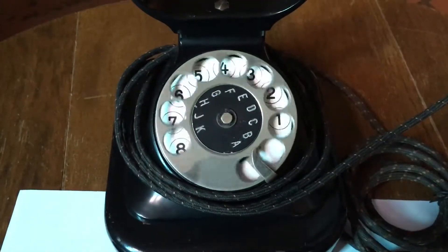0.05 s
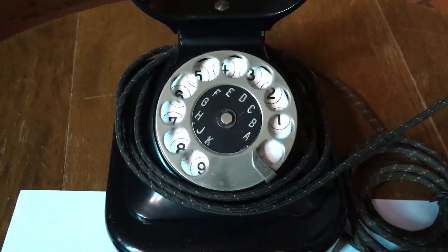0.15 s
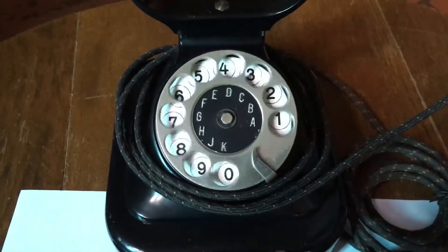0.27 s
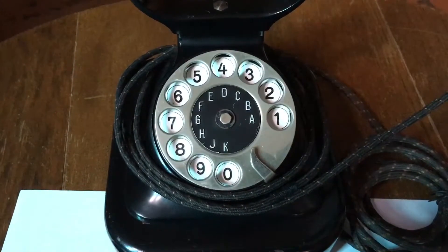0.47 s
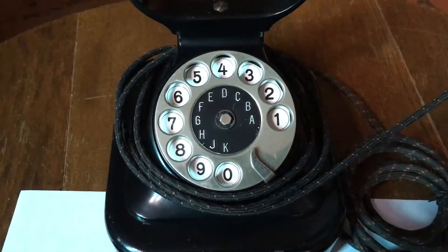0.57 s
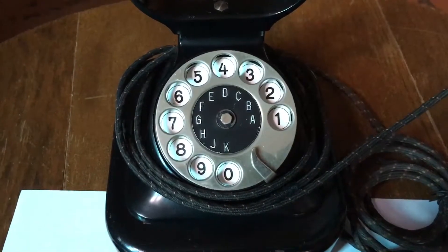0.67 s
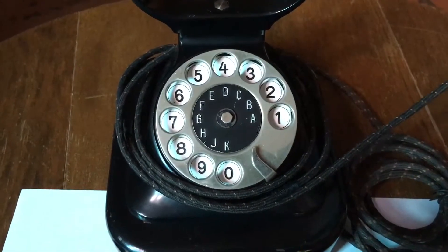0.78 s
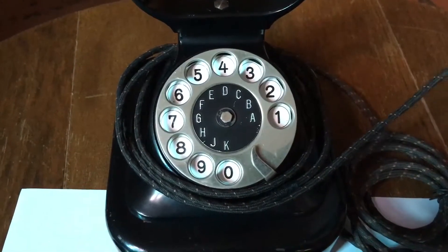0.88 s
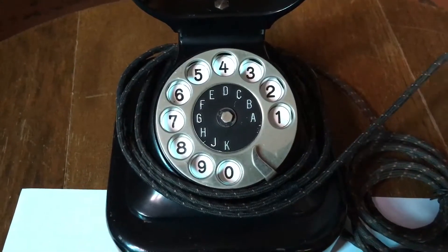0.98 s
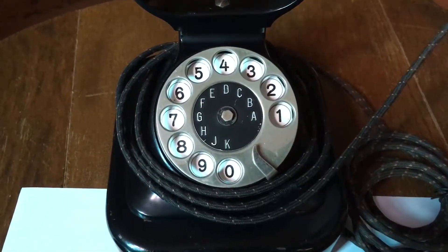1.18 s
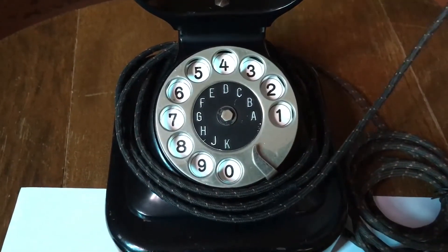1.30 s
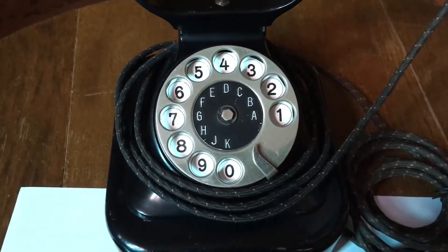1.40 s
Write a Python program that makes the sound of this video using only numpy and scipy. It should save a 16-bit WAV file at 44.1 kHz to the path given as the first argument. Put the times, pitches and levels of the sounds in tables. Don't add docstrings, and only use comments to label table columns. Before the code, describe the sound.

Rotary telephone dial runs back with quick ticks and stops with a sharp, hollow clack

```python
import sys
import numpy as np
from scipy import signal
from scipy.io import wavfile
from scipy.ndimage import uniform_filter1d

SR = 44100
rng = np.random.default_rng(int(sys.argv[2]) if len(sys.argv) > 2 else 0)


def volts(x):
    e = np.asarray(x, float) / 20
    return 10 ** e


def wrap_up_sound(samples):
    columns = np.atleast_2d(samples).T
    tamed = np.clip(columns, -1, 1)
    steps = np.round(tamed * 32767).astype(np.int16)
    wavfile.write(sys.argv[1], SR, steps)


N = 63945


def evened(x):
    return x / np.sqrt(np.mean(x ** 2) + 1e-20)


def read(points, hz):
    point_hz, value = np.transpose(points)
    return np.interp(np.log(hz + 1), np.log(point_hz + 1), value)


def drift(top_hz):
    hz = np.geomspace(top_hz / 10, top_hz, 20)[:, None]
    turns = hz * np.arange(N) / SR + rng.random(hz.shape)
    return evened((np.sin(2 * np.pi * turns) / np.sqrt(hz)).sum(0))


def noise(colour, patchy_db):
    size, hop = 2048, 512
    hz = np.fft.rfftfreq(size, 1 / SR)
    real, imag, raw = rng.standard_normal((N // hop + 5, len(hz), 3)).T
    patches = uniform_filter1d(raw, size=20, axis=0)
    patches = evened(uniform_filter1d(patches, size=5, axis=1))
    level_db = read(colour, hz)[:, None] + patchy_db * patches
    spectra = (real + 1j * imag) * volts(level_db)
    return evened(signal.istft(spectra, nperseg=size, noverlap=size - hop)[1][:N])


def burst(rows, colour, t60_s):
    t = np.arange(N) / SR
    shape = np.zeros(N)
    for start_s, level_db in rows:
        late_s = np.maximum(t - start_s, 0)
        attack = np.minimum(late_s / 0.0002, 1)
        shape += volts(level_db - 60 * late_s / t60_s) * attack
    return shape * noise(colour, 2.1)


def ring(modes, rise_s):
    t = np.arange(SR) / SR
    x = np.zeros(SR)
    for hz, level_db, t60_s in modes:
        phase_turns = 0.2 * rng.random()
        x += volts(level_db - 60 * t / t60_s) * np.sin(2 * np.pi * (hz * t + phase_turns))
    return x * (1 - np.exp(-t / rise_s))


def strikes(rows, chatter_db):
    chatter_decay_s, chatter_per_s, length = 0.0014, 3000, 400
    t = np.arange(length) / SR
    x = np.zeros(N)
    for start_s, level_db in rows:
        chance, height = rng.random((length, 2)).T
        rebound = chance < chatter_per_s / SR
        clicks = volts(chatter_db) * rebound * (2 * height - 1) * np.exp(-t / chatter_decay_s)
        clicks[0] = 1
        at = max(round(start_s * SR), 0)
        x[at:at + length] += volts(level_db) * clicks
    return x


def struck(rows, modes, rise_s, chatter_db):
    body = ring(modes, rise_s)
    return signal.fftconvolve(strikes(rows, chatter_db), body / abs(body).max())[:N]


def contacts():
    # start_s, level_db
    opens = [
        (0.0002, -22.5),
        (0.1043, -20),
    ]
    closes = [
        (0.0248, -27),
        (0.1291, -28.5),
    ]
    # pitch_hz, level_db, t60_s
    open_modes = [(2260, -21, 0.034), (3300, -12.5, 0.0084), (4400, -23, 0.0064), (5950, -0.5, 0.02),
                  (6490, 1, 0.0071), (6840, 0, 0.0064), (8900, -17, 0.0135), (9700, -14.5, .005),
                  (11440, -14.5, 0.012), (14000, -4.5, 0.0059), (15700, -16.5, 0.007)]
    close_modes = [(1660, -16, 0.068), (2380, -13, 0.016), (4560, -15, .015), (6206, -7.5, 0.035),
                   (7180, 1.5, 0.00994), (8872, -2.5, 0.011), (11100, -11, 0.0075), (13500, -13.5, .01)]
    # hz, db_per_hz
    snap_colour = [(880, -56), (1500, -22), (2300, 1.5), (3350, -9), (5770, -8.5), (12500, -21),
                   (16000, -34)]
    # start_s, level_db
    open_knocks = [
        (0.0005, -35),
        (0.1045, -41),
    ]
    close_knocks = [
        (0.0265, -36.5),
        (0.1295, -35),
    ]
    # pitch_hz, level_db, t60_s
    open_knock_modes = [(697, 5.5, 0.06), (730, -8.5, 0.029), (1300, -11.5, .02)]
    close_knock_modes = [(820, -0.5, 0.0263), (676, -10, 0.025)]

    springs = struck(opens, open_modes, 0.000588, -5.5) + struck(closes, close_modes, 0.00015, -5.5)
    snaps = [(start_s, level_db - 18.5) for start_s, level_db in opens]
    snaps += [(start_s, level_db - 8.5) for start_s, level_db in closes]
    knocks = struck(open_knocks, open_knock_modes, 0.0012, -12.5)
    knocks += struck(close_knocks, close_knock_modes, 0.0026, -11)
    return springs + burst(snaps, snap_colour, 0.05) + knocks


def gear_ticks():
    # start_s, level_db, pitch_hz, t60_s
    ticks = [(0.0893, -45, 10400, 0.016), (0.0896, -43, 3150, 0.029), (0.0903, -45, 6050, 0.021),
             (0.1951, -54, 13400, 0.021), (0.2111, -45, 12600, .021), (0.2113, -35, 7100, 0.015),
             (0.2129, -31, 6050, .013), (0.2311, -34, 6450, 0.017), (0.2936, -51, 11100, .016),
             (0.2954, -40, 2420, 0.022), (1.1701, -59, 12000, .012)]
    out = np.zeros(N)
    for start_s, level_db, pitch_hz, t60_s in ticks:
        ratios = volts(np.linspace(-2, 2, 14) + 0.6 * rng.random(14))
        modes = [(pitch_hz * ratio, 0, t60_s) for ratio in ratios]
        out += struck([(start_s, level_db)], modes, 0.00052, -1.1)
    return out


def clack():
    # start_s, metal_db, case_db
    blows = [
        (0.2067, -41, -25),
        (0.2178, -10.5, -19),
        (0.2194, -1, -29.5),
        (0.2211, -19, -6),
        (0.2223, -23, -33),
    ]
    # pitch_hz, level_db, t60_s
    wheel_modes = [(1705, -8, 0.012), (2158, -4, 0.022), (2620, -3, .013), (2875, 2, 0.007),
                   (3180, 5, .009), (3720, -1, 0.011), (4380, -5, 0.007), (4900, -8, 0.004),
                   (5450, -7, .007), (6300, -3, 0.006), (7100, -4, .005), (8700, -19, 0.012),
                   (11530, -28, 0.045), (14150, -12, .004)]
    # pitch_hz, level_db, t60_s
    case_modes = [(160, -20, 0.18), (194.5, -11.5, 0.15), (311.9, -19.5, 0.11), (421.3, -3, 0.093),
                  (516, 1.5, 0.058), (590, -7, 0.086), (637, 9, 0.034), (698.7, -16, 0.027),
                  (875, 5, 0.053), (971, -1, 0.048), (1140, -10, 0.045), (1319.6, -18, 0.022)]
    # hz, db_per_hz
    crack_colour = [(880, -38), (1500, -28), (3000, 2), (5170, -5.5), (6760, -2), (10500, -20.5),
                    (13900, -12.5), (16000, -39)]

    metal_blows = [(start_s, metal_db) for start_s, metal_db, _ in blows]
    case_blows = [(start_s, case_db) for start_s, _, case_db in blows]
    metal = struck(metal_blows, wheel_modes, 0.0001, -14.5)
    crack = volts(-7) * burst(metal_blows, crack_colour, 0.009)
    return metal + crack + struck(case_blows, case_modes, 0.0006, -20)


def bells_and_rattle():
    stop_s = 0.2193
    # pitch_hz, level_db, t60_s
    bell_modes = [(1534, -57, 1.2), (2105, -46.5, 0.45), (2170, -45.5, 1.25), (3774, -63, 1.0),
                  (6062, -55, .26), (7364, -55.5, 1.2), (13400, -54, .3)]
    # hz, db_per_hz
    rattle_colour = [(150, -51), (250, -5.5), (407, -8), (2710, -16), (3710, -12.5), (4730, -32.5),
                     (5930, -16), (13700, -44.5), (16000, -54)]
    at = round(stop_s * SR)
    bells = np.zeros(N)
    bells[at:at + SR] = ring(bell_modes, 0.0064)
    return bells * volts(0.36 * drift(21)) + burst([(stop_s, -35.5)], rattle_colour, 0.37)


def governor():
    whirr_db, end_s, fade_s = -51, 0.3, 0.018
    # hz, db_per_hz
    whirr_colour = [(250, -33.5), (400, -6), (900, -9.5), (2100, -7.5), (3500, -16), (6200, -17.5),
                    (8000, -24.5), (15500, -41.5)]
    # start_s, pitch_hz, level_db
    teeth = [(0.0, 460, -65), (0.016, 477, -44), (0.036, 471, -48), (0.054, 482, -54.5), (0.076, 481, -48),
             (0.11, 456, -55.5), (0.124, 472, -47), (0.202, 470, -58), (0.21, 477, -48)]
    t = np.arange(N) / SR
    running = np.clip((end_s - t) / fade_s, 0, 1)
    start_s, pitch_hz, level_db = np.transpose(teeth)
    turns = np.cumsum(np.interp(t, start_s, pitch_hz)) / SR
    level = volts(np.interp(t, start_s, level_db, right=-120))
    tone = np.sqrt(2) * level * np.sin(2 * np.pi * turns)
    return running * (tone + volts(whirr_db) * noise(whirr_colour, 1.3))


def squeaks():
    rise_s, fall_s = 0.0086, 0.033
    # start_s, length_s, pitch_hz, level_db
    calls = [(0.594, 0.081, 2890, -65), (0.701, 0.038, 2890, -64), (0.894, 0.056, 2870, -66.5),
             (1.029, 0.076, 2223, -59.5), (1.135, 0.07, 2223, -62), (1.137, 0.1, 2740, -65),
             (1.296, 0.072, 2210, -63), (1.025, 0.022, 5630, -73)]
    t = np.arange(N) / SR
    flutter = volts(0.38 * drift(41))
    out = np.zeros(N)
    for start_s, length_s, pitch_hz, level_db in calls:
        rise = (t - start_s) / rise_s
        fall = (start_s + length_s - t) / fall_s + 1
        shape = np.clip(np.minimum(rise, fall), 0, 1)
        out += np.sqrt(2) * volts(level_db) * shape * flutter * np.sin(2 * np.pi * pitch_hz * t)
    return out


def vehicle():
    # hz, db_per_hz
    tyre_colour = [(60, -22), (100, -0.5), (220, 1.5), (300, -19), (600, -22), (1400, -15.5), (2900, -19.5),
                   (5000, -45)]
    # start_s, level_db
    tyre_level = [(.9, -87), (1.0, -59.5), (1.06, -52.5), (1.15, -49), (1.25, -52.5), (1.35, -54.5),
                  (1.45, -67)]
    # start_s, pitch_hz, level_db
    engine = [
        (0.971, 214.3, -81),
        (1.021, 211.9, -61),
        (1.12, 225.8, -55),
        (1.2, 209.9, -59.5),
        (1.271, 190.5, -71),
    ]
    t = np.arange(N) / SR
    tyres = volts(np.interp(t, *np.transpose(tyre_level), left=-120)) * noise(tyre_colour, 1.5)
    start_s, pitch_hz, level_db = np.transpose(engine)
    wavering_hz = np.interp(t, start_s, pitch_hz) * (1 + 0.012 * drift(15.22))
    turns = np.cumsum(wavering_hz) / SR
    level = volts(np.interp(t, start_s, level_db, left=-120, right=-120) + 0.91 * drift(24.2))
    note = np.sin(2 * np.pi * turns) + volts(-4) * np.sin(np.pi * turns)
    return tyres + np.sqrt(2) * level * note


def background():
    # hz, db_per_hz
    hiss_colour = [(160, -45.5), (280, -8.5), (698, -12), (980, -4), (2130, -4), (2530, -7), (2940, -8),
                   (3430, -11), (16000, -32)]
    rumble_colour = [(25, -43), (38, -22.5), (46, 1), (110, -29.5), (180, 1), (230, -15.5), (280, -15.5),
                     (400, -40)]
    # pitch_hz, level_db
    hum = [(52, -60.5), (78, -50.5), (110, -68), (155.5, -80), (195, -59.5)]
    out = volts(-60) * noise(hiss_colour, 1.2) + volts(-60) * noise(rumble_colour, 2.1)
    for pitch_hz, level_db in hum:
        turns = np.cumsum(pitch_hz * (1 + 0.01 * drift(14))) / SR + rng.random()
        out += np.sqrt(2) * volts(level_db + 1.64 * drift(48)) * np.sin(2 * np.pi * turns)
    return out


def room(x):
    # hz, t60_s
    decay = [(200, 1), (600, 0.35), (2000, 0.55), (6000, 0.34), (14000, 0.24)]
    spacing = 20
    taps = np.zeros(SR // 2)
    at = np.arange(150, SR // 2 - spacing, spacing)
    at = at + rng.integers(0, spacing, len(at))
    taps[at] = rng.choice([-1.0, 1.0], len(at))
    hz, t, spectra = signal.stft(taps, SR, nperseg=256)
    fall = volts(-60 * t / read(decay, hz)[:, None])
    tail = signal.istft(spectra * fall, SR, nperseg=256)[1]
    return signal.fftconvolve(x, tail / np.linalg.norm(tail))[:N]


def scene():
    phone = contacts() + gear_ticks() + clack()
    near = phone + volts(-19.5) * room(phone) + bells_and_rattle() + governor()
    return (near + squeaks() + vehicle() + background())[None]


def top_cut(x):
    return signal.sosfilt(signal.butter(12, 16600, fs=SR, output="sos"), x)


def record(dry):
    low_hz, edge_hz = 42, 16150
    high_pass = signal.butter(3, low_hz, btype="high", fs=SR, output="sos")
    thin = signal.sosfilt(high_pass, dry)
    edge = signal.firwin(255, edge_hz, window=("kaiser", 9), fs=SR)[None]
    return top_cut(signal.oaconvolve(thin, edge, "same"))


dry = scene()
out = record(dry)
wrap_up_sound(out)
```